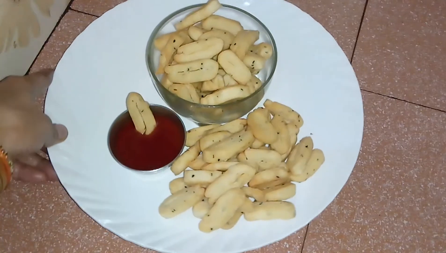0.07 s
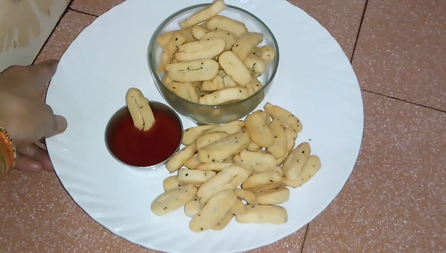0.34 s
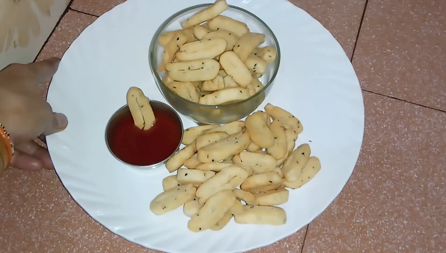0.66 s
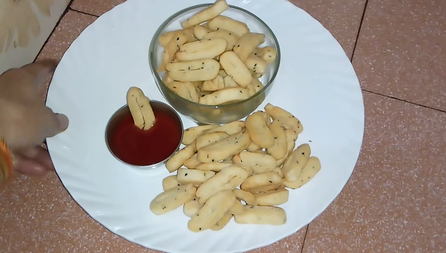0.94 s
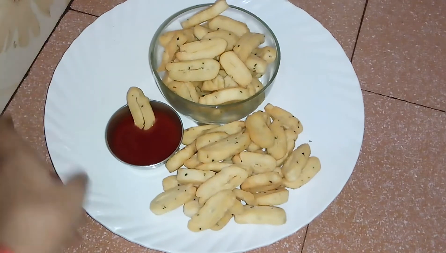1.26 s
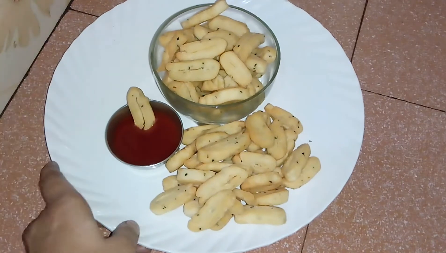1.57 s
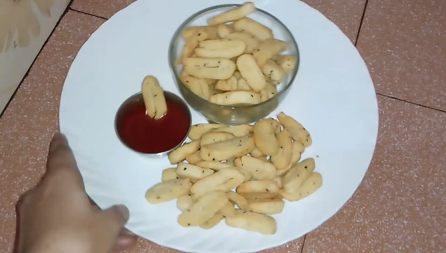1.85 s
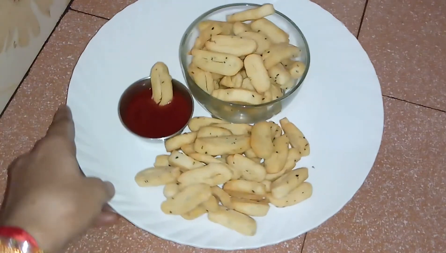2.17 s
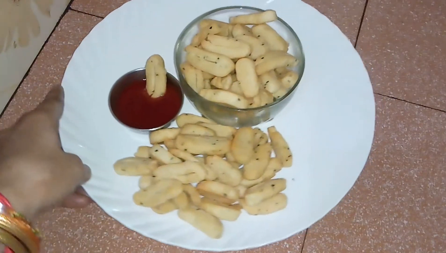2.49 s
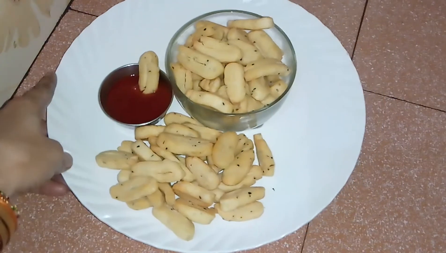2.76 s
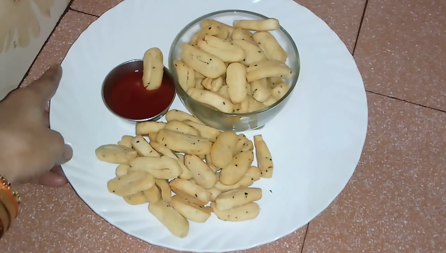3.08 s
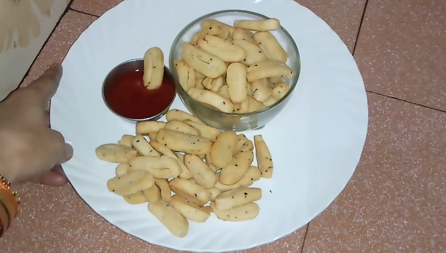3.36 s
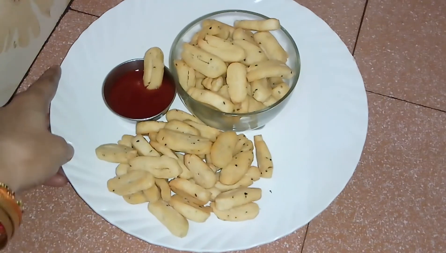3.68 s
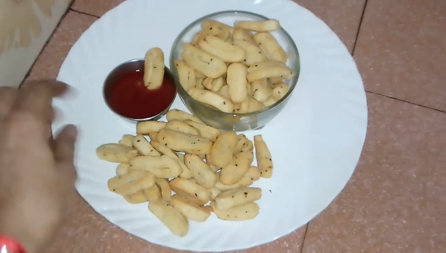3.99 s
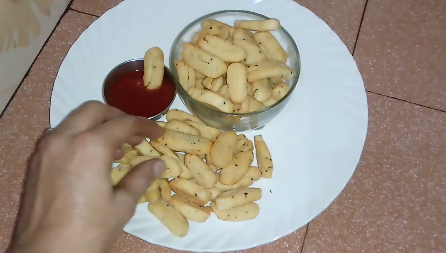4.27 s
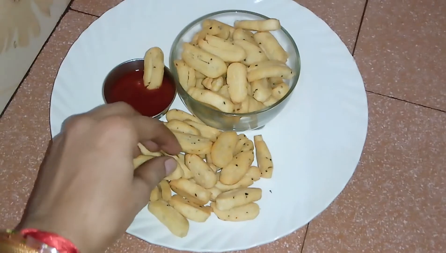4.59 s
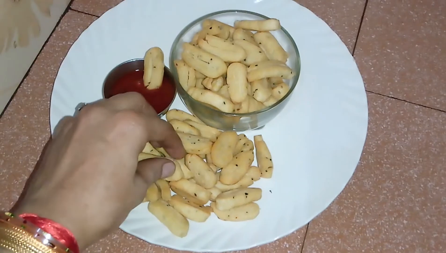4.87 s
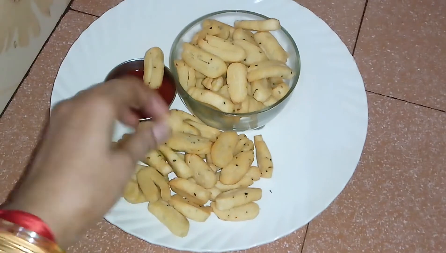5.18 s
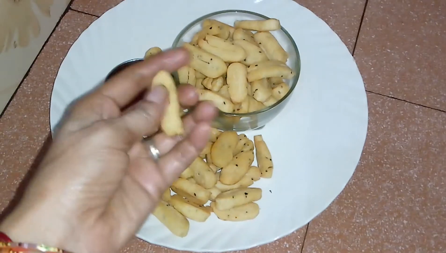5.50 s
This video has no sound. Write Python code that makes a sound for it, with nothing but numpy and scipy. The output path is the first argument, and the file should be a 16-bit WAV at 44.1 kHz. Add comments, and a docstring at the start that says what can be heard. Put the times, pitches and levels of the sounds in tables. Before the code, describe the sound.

A plate loaded with fried snacks scrapes on gritty floor tiles right from the start, close up: a bright, grainy grinding with sharp little cracks that ring the dish slightly. It fades by 0.6 seconds. After a pause with a few tiny ticks, a second, longer push begins at 1.7 seconds, swelling unevenly around 1.9, 2.4 and 2.8 seconds, then thinning into small ticks until 3.3 seconds. Around 4.3 seconds a hand reaches in with a very faint, high friction squeak. A light, short clack on the rim follows at 4.4 seconds, then a soft, dry brush of snack pieces between 4.5 and 4.7 seconds. A faint hissy handling rustle rises and falls with the hand, once more near 5.3 seconds. A fan's soft, steady air and faint motor hum run underneath until the end, around 5.6 seconds. The tiled room adds a short echo.

```python
"""Snack plate turned on gritty tiles

A loaded plate of fried snacks is turned in two pushes. Grit slips and cracks under its foot and
rings the plate's resonances. Then a hand reaches in: a faint friction squeak, a clack on the rim,
snack pieces brushing each other. Behind it, a soft rustle of handling and a fan's air and motor hum."""
import sys
import numpy as np
from scipy import signal
from scipy.fft import rfft, irfft, next_fast_len
from scipy.io import wavfile

SR = 44100
rng = np.random.default_rng(int(sys.argv[2]) if len(sys.argv) > 2 else 0)


def output_pcm(signal):
    """Save a mono or channel-first signal as 16-bit PCM at the path in sys.argv[1].

    Samples are clipped to [-1, 1] before scaling.
    """
    pcm = np.clip(np.atleast_2d(signal).T, -1, 1) * 32767
    wavfile.write(sys.argv[1], SR, np.round(pcm).astype(np.int16))


N = 253134
TIME = np.arange(N) / SR
LEFT_RIGHT = np.array([[1], [-1]])


# Grinding contour, one curve per push: (time [s], level [dB], brightness [dB])
PUSHES = [
    [(0, -36, -1.5), (.1, -35.5, -3), (.2, -35, -2.5), (.26, -38.5, -1), (.31, -38, -2), (.37, -43, -1.5),
     (.45, -41, -0.5), (.53, -53, -3), (.6, -52.5, 1), (.63, -68, 3)],
    [(1.672, -40, 3), (1.692, -42, -2), (1.703, -37.5, -1.5), (1.745, -42, -4), (1.8, -40.5, -4),
     (1.92, -36, -2.5), (1.98, -38, -2), (2.05, -39, 0), (2.11, -45.5, -4.5), (2.2, -44.5, -3.5),
     (2.33, -42, -4.5), (2.40, -35, 0), (2.445, -33.5, -3), (2.48, -39.5, -3.5), (2.55, -42, -2.5),
     (2.66, -47, -5.5), (2.75, -43, -6.5), (2.79, -35, -0.5), (2.83, -44.5, -3), (2.89, -57.5, 2),
     (3.12, -54.5, 1), (3.28, -71, -6)],
]

def push_contour():
    """Grinding level and brightness per sample, in dB; silent between pushes."""
    level_db, bright_db = np.full(N, -120.), np.zeros(N)
    for push in PUSHES:
        times_s, levels_db, tilts_db = np.transpose(push)
        level_db = np.maximum(level_db, np.interp(TIME, times_s, levels_db, left=-120, right=-120))
        bright_db += np.interp(TIME, times_s, tilts_db, left=0, right=0)
    return level_db, bright_db


def grinding(slips_per_s, spread_db, slip_s, judder_db, diffuse_db):
    """Grit under the foot: dense micro-slips of uneven size, each a short friction burst."""
    sizes = from_db(spread_db * np.minimum(rng.exponential(1, N), 4))
    slips = sizes * (rng.random(N) < slips_per_s / SR)
    energy = signal.lfilter([1], [1, -np.exp(-1 / (slip_s * SR))], slips ** 2 + 1e-12)
    grip = np.sqrt(energy) * from_db(judder_db * drift(70))
    direct = bounce_paths(grip * rng.standard_normal(N))
    diffuse = from_db(diffuse_db) * grip * rng.standard_normal((2, N))
    level_db, bright_db = push_contour()
    pan_db = 0.5 + drift(9.3)
    return from_db(level_db + LEFT_RIGHT * pan_db / 2) * brighten(unit_rms(direct + diffuse), bright_db)


def small_grains(count=200, per_s=60, top_db=-17, follow=0.96, spread_db=3):
    """Rows as in LARGE_GRAINS, unevenly timed; their level follows the grinding's treble."""
    times_s = (np.arange(count) + rng.random(count)) / per_s
    strength, place, tone = np.clip(rng.standard_normal((count, 3)), -2, 2).T
    treble_db = sum(push_contour())  # level + brightness
    below_top_db = np.interp(times_s, TIME, treble_db) - treble_db.max()
    level_db = top_db + follow * below_top_db + spread_db * strength
    pan_db, bright_db = 1.5 + place, 5 + tone
    return np.transpose([times_s, level_db, pan_db, bright_db])


# Largest grains cracking: (time [s], level [dB], left minus right [dB], brightness [dB])
LARGE_GRAINS = [(0.002, -9, 0, 1), (0.0435, -9, 2, 5), (0.0648, -10, 1, -4), (0.0725, -6.5, 2, 3),
                (0.0868, -9, 1, 0.5), (0.102, -12, -6, 0), (0.1368, -3, 1, 1), (0.171, -14.5, 4, 10),
                (0.1836, -6.5, 0, 4.5), (0.187, -8, 2, 4.5), (0.2232, -9, 2, 4), (0.2864, -9.5, -1, 5),
                (0.3075, -12, 3, 4), (0.3202, -13, 0, -5), (0.335, -15.5, -2, -5), (0.398, -10.5, 2, 1),
                (0.427, -18, 0, 3), (0.4312, -12, 0, 0), (0.4542, -14.5, -4, 1), (0.467, -23, 2, 3),
                (0.5077, -16.5, 4, 3), (0.5123, -15, 4, 1.5), (0.5472, -23, -2, 3), (0.558, -24, 4, 4),
                (0.6034, -38, 0, 1), (0.7148, -35.5, -3, 8), (1.059, -25, 0, 7.5), (1.6378, -26, 1, 11),
                (1.674, -7, -0.5, 0), (1.6967, -4.5, -3, 0.5), (1.7097, -20, -6, 0), (1.7599, -17, 2, -4),
                (1.7953, -16, 2, -3), (1.826, -15, -4, 0), (1.8737, -11.5, 1, -4), (1.9305, -1, 2, -2),
                (2.0148, -17, 2, 7), (2.0236, -18, 0, 3), (2.0663, -5.5, -5, -1), (2.078, -9, 1, 4.5),
                (2.1372, -9, 1, 5), (2.1708, -15.5, 7, 5), (2.2477, -25, 3, -1), (2.6728, -21, 8, 2),
                (2.6906, -6.5, 4.5, 0), (2.7005, -12.5, 0, -2), (2.734, -16, 8, 1), (2.775, -10.5, 10, 0),
                (2.786, -15, 6, 1), (2.795, -9, 3, 2), (2.8, -15, 5, 2), (2.8103, -17, 2, 8),
                (2.833, -17, 1, 8), (2.8504, -10, 3.5, 4.5), (2.875, -24, -1, 4), (2.9113, -29, 5, 4),
                (2.9431, -20, 7, 6.5), (2.955, -22, -3, 8), (2.9758, -19, 5, 5), (3.0, -26, 1, 5),
                (3.0425, -29, 5, 7), (3.0467, -28, 1, 5), (3.121, -20, 8, 0), (3.1675, -31, 3, 4),
                (3.189, -31, 4, 6), (3.207, -32, 5, 6), (3.2252, -32, 4, 1), (3.2316, -28.5, 1, 7.5),
                (3.8975, -33, -2, 7)]
# Grain ring, rising as the plate comes to rest: (time [s], gain [dB])
GRAIN_RING_GAIN = [(2.6, -17), (2.9, -2)]

def cracks(snap_t60_s, crumble_t60_s, crumble_db, rise_s=0.00023, size=2048):
    """Large and small grains snap, ring and briefly crumble."""
    grains = [*LARGE_GRAINS, *small_grains()]
    age_s, out = TIME[:size], np.zeros((2, N + size))
    envelope = decay(age_s, snap_t60_s) + from_db(crumble_db) * decay(age_s, crumble_t60_s)
    envelope *= 1 - np.exp(-age_s / rise_s)
    for time_s, level_db, pan_db, bright_db in grains:
        snap = envelope * rng.standard_normal(size)
        ring_db = np.interp(time_s, *np.transpose(GRAIN_RING_GAIN))
        snap += from_db(ring_db) * resonate(snap, hz=8760, width_hz=930)
        stereo = bounce_paths(brighten(snap, bright_db))
        start = np.clip(round(time_s * SR), 0, N)
        out[:, start:start + size] += from_db(level_db + LEFT_RIGHT * pan_db / 2) * stereo
    return out[:, :N]


# Plate groans: (time [s], half length [s], frequency [Hz], gain [dB])
GROANS = [(1.86, .07, 2350, -6), (2.29, .04, 2500, -6), (2.445, .022, 1950, -3)]

def groans(force, width_hz=280):
    """Where the foot grips harder, friction swells in one low plate resonance."""
    return sum(from_db(db) * swell(time_s, half_s) * resonate(force, hz, width_hz)
               for time_s, half_s, hz, db in GROANS)


# Plate resonances: (frequency [Hz], width [Hz], gain [dB])
PLATE_MODES = [(1420, 110, -8), (2040, 90, -5), (2330, 200, -2.5), (2850, 170, -7), (3870, 130, -7),
               (4300, 220, -8), (4850, 200, -5), (6500, 260, -10), (7240, 200, -2), (8080, 150, -9),
               (10300, 200, -8)]
# Grinding spectrum: (frequency [Hz], left [dB], right [dB])
GRIND_SPECTRUM = [(250, -28.5, -24.5), (750, -21, -11), (1180, -15.5, -17.5), (1850, -5.5, -4.5),
                  (2550, -6, -6), (3120, -2, -4), (4560, -2.5, -3.5), (6150, 0.5, -2), (7560, 0.5, -5.5),
                  (8200, 5.5, 0.5), (9230, 5.5, 2), (10450, -6, 6), (11400, -15, -3), (12900, -31, -25)]

def plate(force, ring_db, shift_db, notch_hz, notch_depth):
    """Friction radiates through the plate's modes; their gains shift as the contact point moves."""
    modes = sum(from_db(db + shift_db * drift(8.1)) * resonate(force, hz, width_hz)
                for hz, width_hz, db in PLATE_MODES)
    sound = force + from_db(ring_db) * modes
    sound -= notch_depth * resonate(sound, notch_hz, width_hz=220)  # weak radiation between two modes
    hz, left_db, right_db = np.transpose(GRIND_SPECTRUM)
    return np.array([colour(sound[0], hz, left_db), colour(sound[1], hz, right_db)])


def turning(sound, swing_db=3.5, changes_per_s=9, width_ratio=0.04):
    """Narrow peaks and dips come and go as the plate turns, different on each side."""
    for hz in np.geomspace(1800, 11000, 22):
        gain_db = swing_db * np.clip([drift(changes_per_s), drift(changes_per_s)], -1.7, 1.7)
        sound = sound + (from_db(gain_db) - 1) * resonate(sound, hz, hz * width_ratio)
    return sound


# Plate-to-tile bounces, left row then right: (first delay [s], second delay [s])
BOUNCE_DELAYS = [(.00023, .00061), (.00034, .00089)]

def bounce_paths(x, feedback=0.74):
    """Mono to stereo: quick bounces between plate and tiles, one allpass chain per side."""
    sides = []
    for delays_s in BOUNCE_DELAYS:
        path = x
        for delay_s in delays_s:
            loop = np.zeros(round(delay_s * SR) + 1)
            loop[0], loop[-1] = 1, -feedback
            path = signal.lfilter(loop[::-1], loop, path + 1e-18)
        sides.append(path)
    return np.array(sides)


def floor_echo(sound, delay_s=0.00207, wander_s=0.00005, changes_per_s=6, gain=0.3):
    """A close tile echo ripples the spectrum; the ripple slides as the delay wanders."""
    echo = [np.interp(TIME - delay_s - wander_s * drift(changes_per_s), TIME, side) for side in sound]
    return sound + gain * np.array(echo)


# Knocks on the rim: (time [s], level [dB], brightness [dB])
RIM_KNOCKS = [(4.4127, -33, 1), (4.4141, -27.5, 0), (4.4189, -32, 0), (4.4343, -37, 2), (4.4376, -36, 1),
              (4.4412, -36, 3)]
# Rim modes: (frequency [Hz], gain [dB], T60 [s])
RIM_MODES = [(1410, -15, 0.025), (1830, -9, 0.022), (1950, -3, 0.016), (2320, 1, 0.017), (2690, -14, 0.02),
             (2950, -7, 0.024), (3950, -10, 0.01), (4650, -7, 0.007), (5350, -10, 0.007)]
# Dry clatter spectrum: (frequency [Hz], gain [dB])
CLATTER_SPECTRUM = [(400, -27), (1300, -2), (2000, 10), (3000, -1.5), (3600, -12), (4700, 1), (5400, -4),
                    (5900, -12), (7500, -10), (8200, -6), (10500, -9), (12000, -26)]

def rim_clack(rattle_t60_s, rattle_db, clatter_db):
    """Each knock, a click plus a brief rattle, drives the rim modes over a dry clatter."""
    clicks, rattle = np.zeros(N), np.zeros((2, N))
    noise = rng.standard_normal((2, N))
    for time_s, level_db, bright_db in RIM_KNOCKS:
        impulse = signal.unit_impulse(N, round(time_s * SR)) + 1e-18
        envelope = burst(time_s, rattle_t60_s, rise_s=0.00033)
        clicks += from_db(level_db) * brighten(impulse, bright_db, split_hz=3300)
        rattle += from_db(level_db) * envelope * brighten(noise, bright_db)
    force = clicks + from_db(rattle_db) * rattle
    modes = sum((-1) ** k * from_db(db) * ring(force, hz, t60_s)
                for k, (hz, db, t60_s) in enumerate(RIM_MODES))
    return modes + from_db(clatter_db) * colour(rattle, *np.transpose(CLATTER_SPECTRUM))


# Snack contacts: (time [s], T60 [s], level [dB])
BRUSHES = [(4.518, 0.16, -38), (4.55, 0.14, -42.5)]
# Brushing spectrum: (frequency [Hz], gain [dB])
BRUSH_SPECTRUM = [(1000, -9), (2300, 5), (3600, -14), (5300, -5), (6500, -14), (12000, -14)]

def snack_brush(grain_db, rise_s):
    """Snack pieces rub together: soft bursts of dry, grainy friction."""
    envelope = sum(from_db(db) * burst(time_s, t60_s, rise_s) for time_s, t60_s, db in BRUSHES)
    friction = envelope * from_db(grain_db * drift(400)) * rng.standard_normal((2, N))
    return colour(friction, *np.transpose(BRUSH_SPECTRUM))


# Squeak contour: (time [s], level [dB])
SQUEAK_CONTOUR = [(4.18, -73), (4.23, -62), (4.3, -55.5), (4.36, -62), (4.42, -67)]
# Squeak bands: (frequency [Hz], width [Hz], gain [dB], contour scale [ratio])
SQUEAK_BANDS = [(4330, 620, 0.5, 1.1), (8150, 520, -1, 1.6)]

def squeak():
    """Two narrow friction bands swell and fade; the upper one sounds only near the peak."""
    times_s, levels_db = np.transpose(SQUEAK_CONTOUR)
    top_db = levels_db.max()
    below_top_db = np.interp(TIME, times_s, levels_db, left=-120, right=-120) - top_db
    noise, out = rng.standard_normal((2, N)), np.zeros((2, N))
    for hz, width_hz, gain_db, follow in SQUEAK_BANDS:
        band = resonate(resonate(noise, hz, width_hz), hz, width_hz)
        out += from_db(top_db + gain_db + follow * below_top_db) * unit_rms(band)
    return out


# Rustle spectrum: (frequency [Hz], left [dB], right [dB])
RUSTLE_SPECTRUM = [(1000, -34, -21), (2500, -0.5, -3), (6500, -3.5, -17), (9400, 5, 7), (10720, -11, 10.5),
                   (11670, -12, -4)]
# Hand movements: (time [s], half length [s], rise [dB])
RUSTLE_SWELLS = [(0.892, 0.058, 3.5), (1.277, 0.059, 4), (1.54, 0.052, 4.5), (3.68, 0.024, 5),
                 (4.26, .07, 2), (5.303, 0.079, 5.5), (5.6, 0.062, 2)]

def handling_rustle(level_db, wander_db, flutter_db):
    """Fine hiss that swells as the hand moves."""
    hz, *sides_db = np.transpose(RUSTLE_SPECTRUM)
    hiss = np.array([colour(rng.standard_normal(N), hz, side_db) for side_db in sides_db])
    swell_db = sum(db * swell(time_s, half_s) for time_s, half_s, db in RUSTLE_SWELLS)
    return unit_rms(hiss) * from_db(level_db + swell_db + wander_db * drift(12) + flutter_db * drift(65))


# Moving air and hiss: (frequency [Hz], mid [dB], side [dB])
AIR_SPECTRUM = [(40, -33.5, -31), (92, -23, 2), (224, -18.5, -13), (485, -11.5, -0.5), (740, -6.5, -6),
                (907, -6, -3), (1198, -11, -12), (1986, -18.5, -21), (2110, -23.5, -21.5), (4030, -28, -28),
                (7200, -30.5, -30), (10000, -34.5, -40), (11300, -35.5, -34)]
# Fan motor lines: (frequency [Hz], mid [dB], side [dB])
MOTOR_LINES = [(63.7, -78.5, -72), (194.3, -77, -69.5), (316.8, -75.5, -66), (448.6, -75, -89),
               (576.8, -67.5, -66.5), (953, -67, -77)]

def fan(air_db, flutter_db, waver_hz):
    """Rushing air and wavering motor lines; the bass is largely in antiphase between left and right."""
    hz, mid_db, side_db = np.transpose(AIR_SPECTRUM)
    air_gain = from_db(air_db + flutter_db * drift(12))
    mid = air_gain * colour(rng.standard_normal(N), hz, mid_db)
    side = air_gain * colour(rng.standard_normal(N), hz, side_db)
    lowest_hz = MOTOR_LINES[0][0]
    for line_hz, line_mid_db, line_side_db in MOTOR_LINES:
        pitch_hz = line_hz + waver_hz * line_hz / lowest_hz * drift(25)
        phase = 2 * np.pi * np.cumsum(pitch_hz) / SR
        mid += np.sqrt(2) * from_db(line_mid_db) * np.sin(phase)
        side += np.sqrt(2) * from_db(line_side_db) * np.cos(phase)
    return mid + LEFT_RIGHT * side


def room(x, t60_s=0.29, gap_s=0.003):
    """Diffuse tile echoes: a different unit-energy noise tail per side."""
    age_s = TIME[:SR // 2]
    tail = rng.standard_normal((2, len(age_s))) * decay(age_s, t60_s) * (age_s > gap_s)
    return signal.fftconvolve(x, tail / np.sqrt(np.sum(tail ** 2) / 2), axes=1)[:, :N]


def from_db(db):
    return 10 ** (np.asarray(db) / 20)


def unit_rms(x):
    return x / np.sqrt(np.mean(x ** 2) + 1e-20)


def drift(changes_per_s):
    """Piecewise-linear random curve, unit RMS."""
    knots = rng.standard_normal(4096)
    return unit_rms(np.interp(TIME * changes_per_s, np.arange(len(knots)), knots))


def decay(age_s, t60_s):
    return np.exp(-np.minimum(np.log(1000) * age_s / t60_s, 20))


def swell(centre_s, half_s):
    return np.exp(-((TIME - centre_s) / half_s) ** 2)


def burst(start_s, t60_s, rise_s):
    """Envelope of one short contact."""
    age_s = np.maximum(TIME - start_s, 0)
    return (1 - np.exp(-np.minimum(age_s / rise_s, 20))) * decay(age_s, t60_s)


def colour(x, hz, db):
    """Minimum-phase filter through the given spectrum points."""
    size = next_fast_len(N + 8192)
    size += size % 2
    grid_hz = np.maximum(np.arange(size // 2 + 1) * SR / size, 1)
    gain = from_db(np.interp(np.log(grid_hz), np.log(hz), db))
    cepstrum = irfft(np.log(gain))
    cepstrum[1:size // 2] *= 2
    cepstrum[size // 2 + 1:] = 0
    return irfft(rfft(x, size) * np.exp(rfft(cepstrum)))[..., :N]


def resonate(x, hz, width_hz):
    """Resonator with unit peak gain."""
    radius = np.exp(-np.pi * width_hz / SR)
    feedback = [1, -2 * radius * np.cos(2 * np.pi * hz / SR), radius ** 2]
    return signal.lfilter(np.array([1, 0, -1]) * (1 - radius ** 2) / 2, feedback, x + 1e-18)


def ring(x, hz, t60_s):
    """Mode: a unit click starts a decaying unit sine."""
    radius, angle = from_db(-60 / (t60_s * SR)), 2 * np.pi * hz / SR
    return signal.lfilter([0, np.sin(angle)], [1, -2 * radius * np.cos(angle), radius ** 2], x + 1e-18)


def brighten(x, db, split_hz=5500):
    """Tilt: treble up and bass down by db each."""
    treble = signal.sosfilt(signal.butter(1, split_hz, "high", fs=SR, output="sos"), x)
    return treble * from_db(db) + (x - treble) / from_db(db)


def scene():
    """Stereo mix of plate, hand, room and fan."""
    grind = grinding(slips_per_s=2200, spread_db=2.5, slip_s=0.0015, judder_db=1.35, diffuse_db=4)
    grind *= from_db(3)
    crack = from_db(-7) * cracks(snap_t60_s=0.0038, crumble_t60_s=0.094, crumble_db=-19.5)
    force = grind + crack + groans(grind)
    radiated = plate(force, ring_db=-2.5, shift_db=4, notch_hz=3650, notch_depth=0.7)
    scrape = floor_echo(turning(radiated))
    # the top of each snap bypasses the plate
    snap = from_db(-24) * signal.sosfilt(signal.butter(4, 12000, "high", fs=SR, output="sos"), crack)
    clack = from_db(-7) * rim_clack(rattle_t60_s=0.012, rattle_db=-13, clatter_db=14)
    reverb = from_db(-9.5) * room(scrape) + from_db(-6) * room(clack)
    air = from_db(-1.1 * LEFT_RIGHT) * fan(air_db=-34, flutter_db=1.14, waver_hz=0.9)
    reach = snack_brush(grain_db=2, rise_s=0.0021) + from_db(2) * squeak()
    rustle = handling_rustle(level_db=-61.5, wander_db=0.8, flutter_db=1.5)
    return scrape + snap + clack + reach + rustle + reverb + air


def record(dry, shelf_hz=12300, shelf_db=-19.5, cutoff_hz=15800):
    """Microphone: steep drop to a treble shelf, then a hard top cut."""
    lows = signal.sosfilt(signal.butter(12, shelf_hz, fs=SR, output="sos"), dry)
    shelved = lows + from_db(shelf_db) * dry
    return signal.sosfilt(signal.cheby2(12, 50, cutoff_hz, fs=SR, output="sos"), shelved)


dry = scene()
out = record(dry)
output_pcm(out)
```